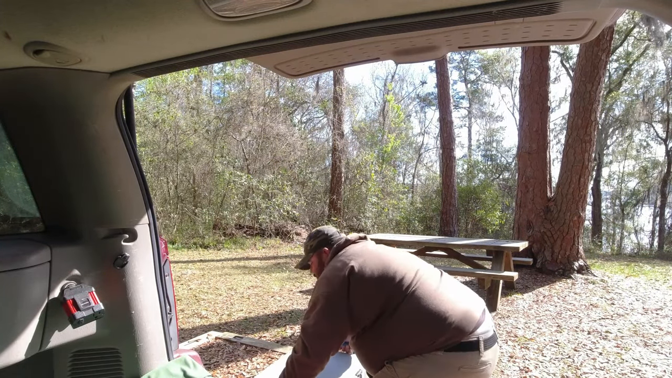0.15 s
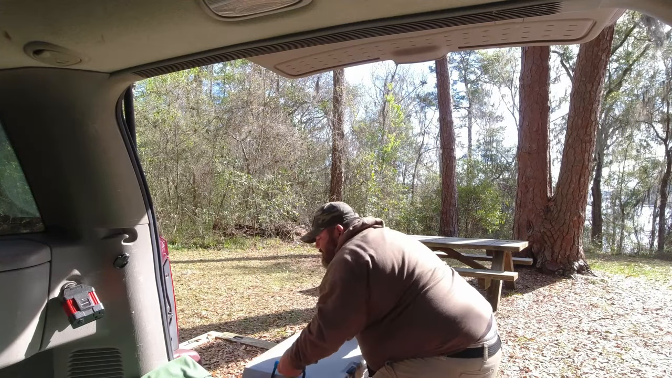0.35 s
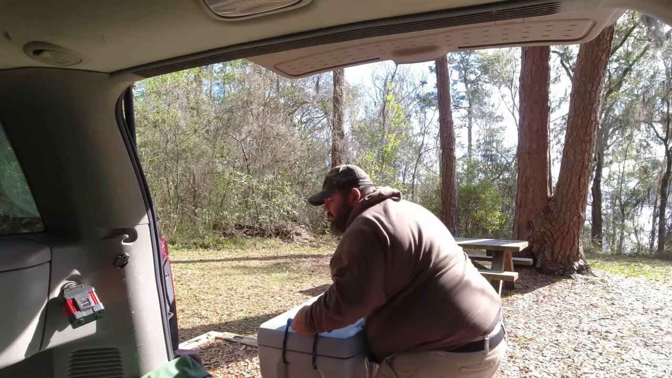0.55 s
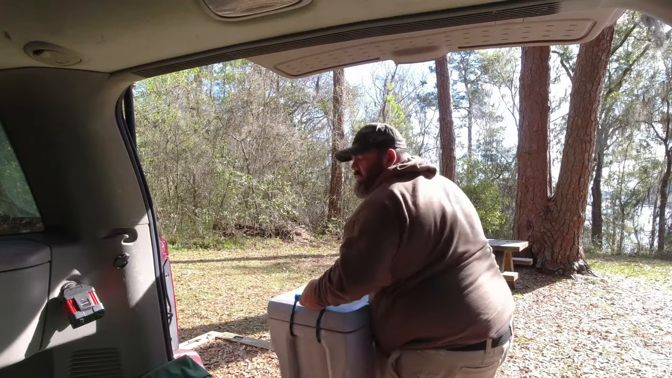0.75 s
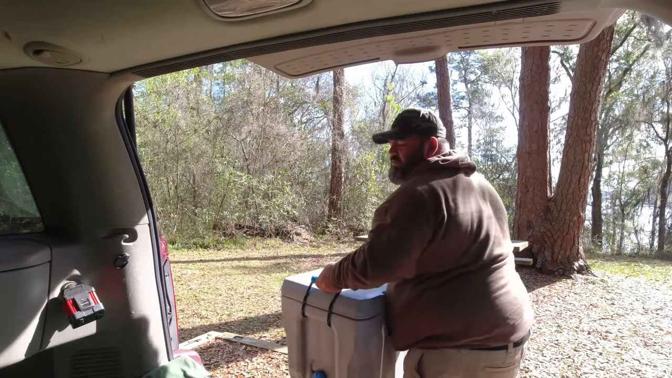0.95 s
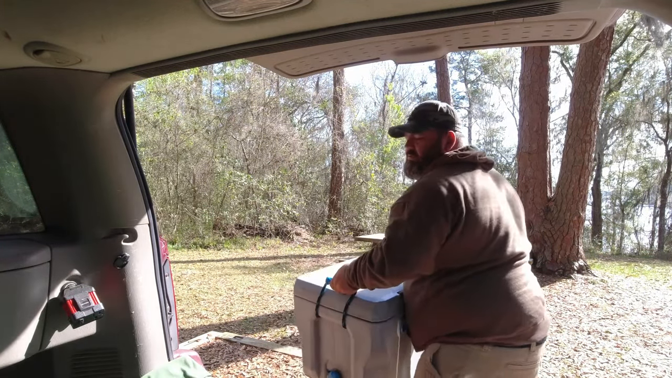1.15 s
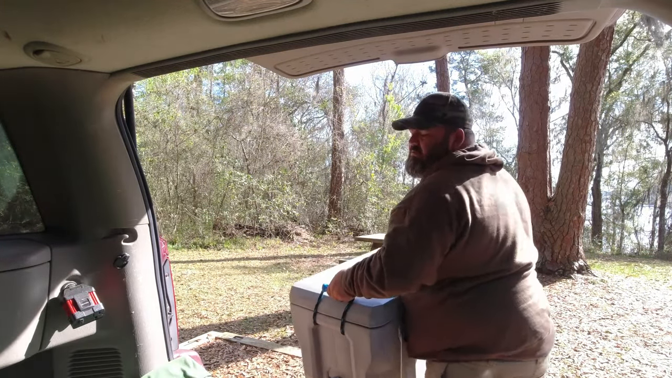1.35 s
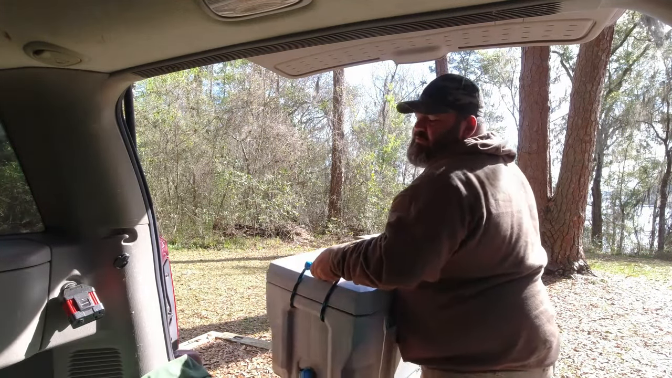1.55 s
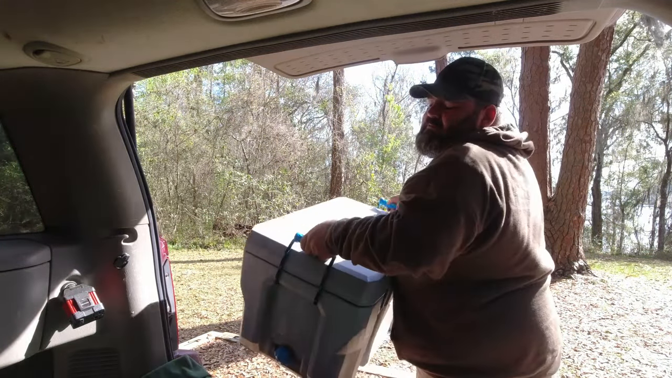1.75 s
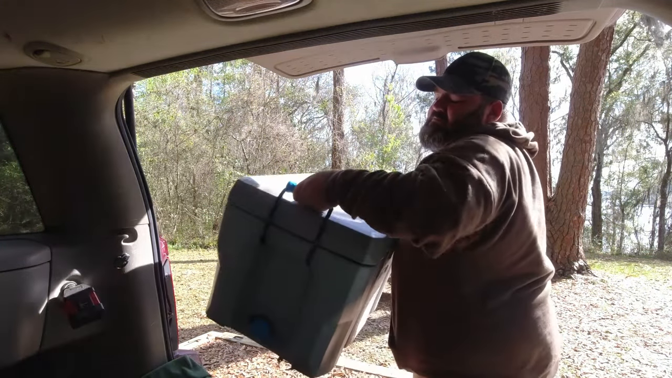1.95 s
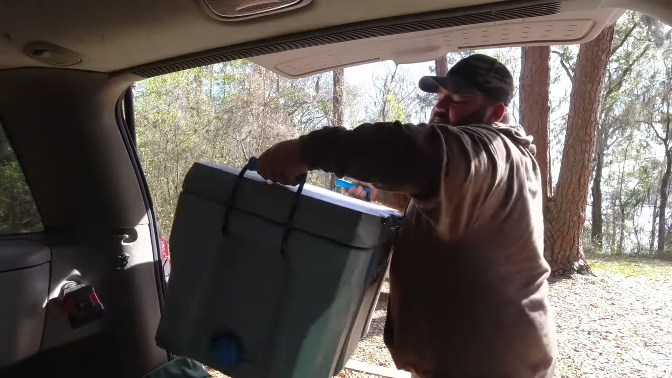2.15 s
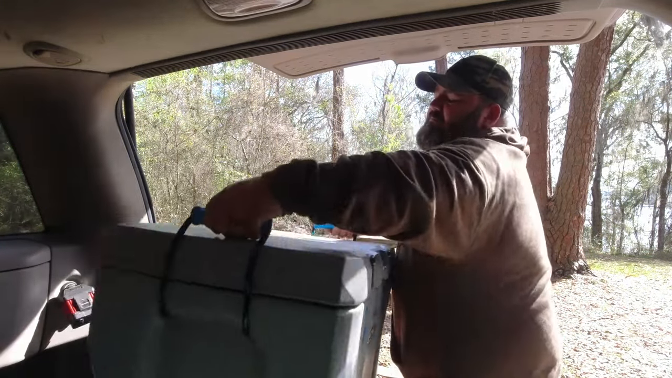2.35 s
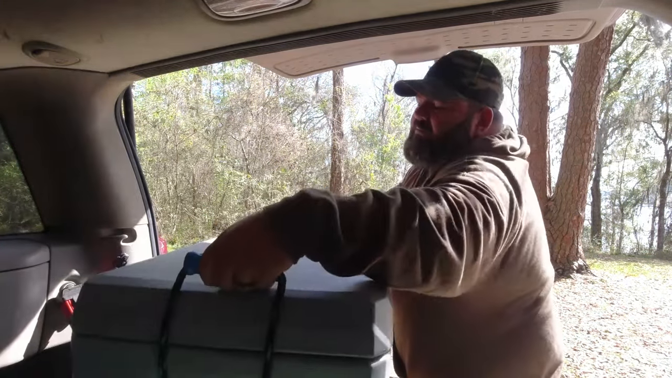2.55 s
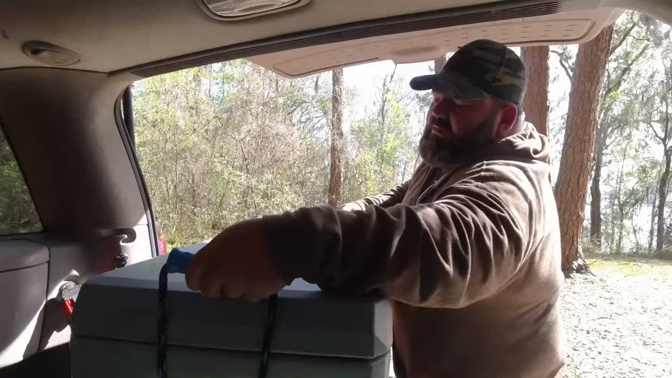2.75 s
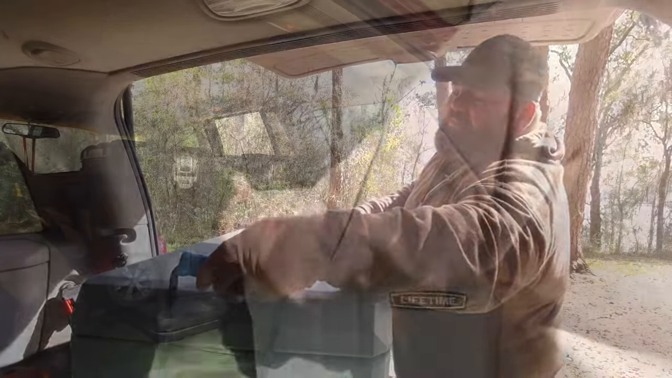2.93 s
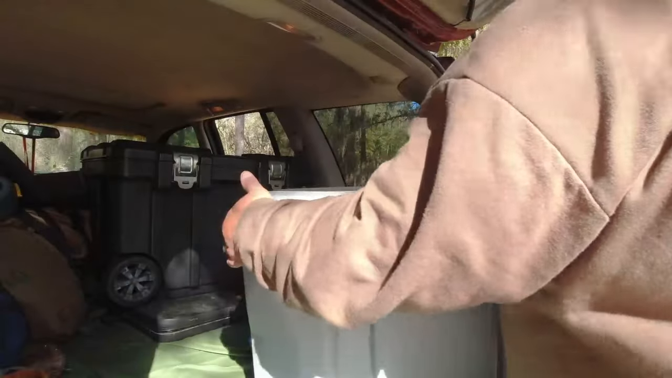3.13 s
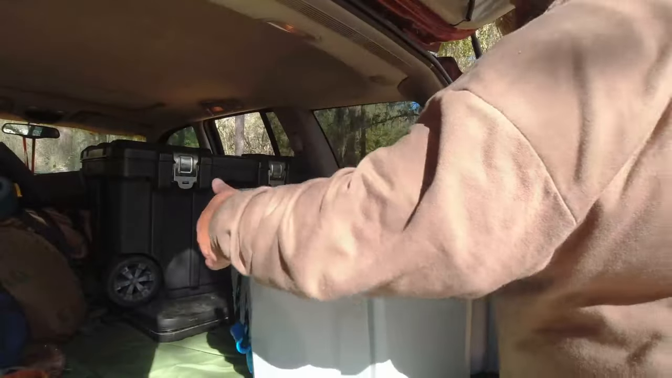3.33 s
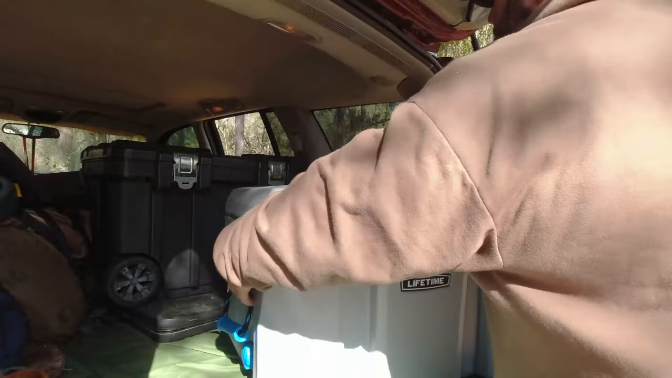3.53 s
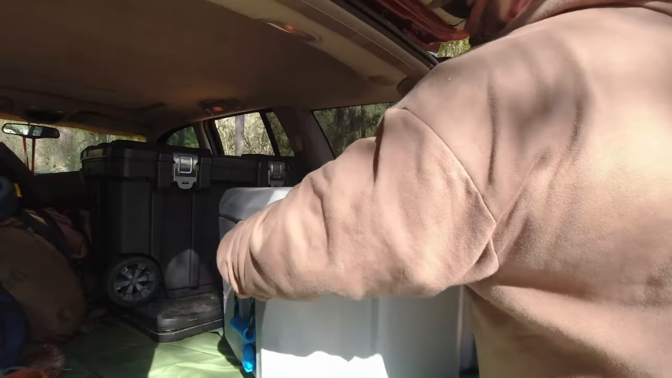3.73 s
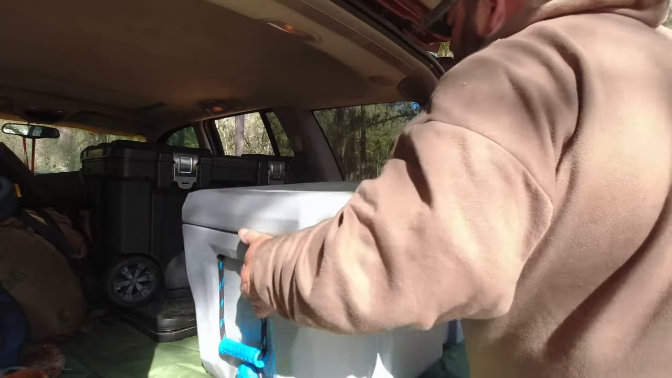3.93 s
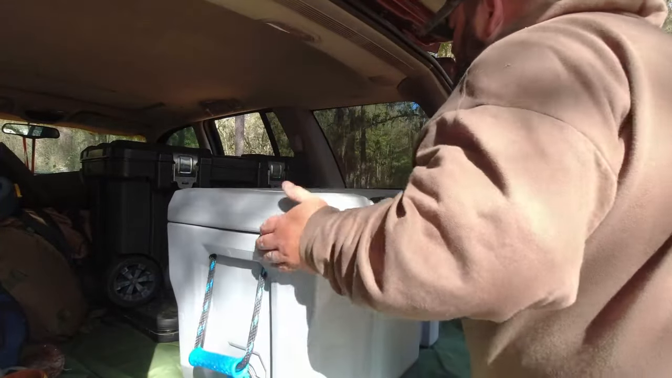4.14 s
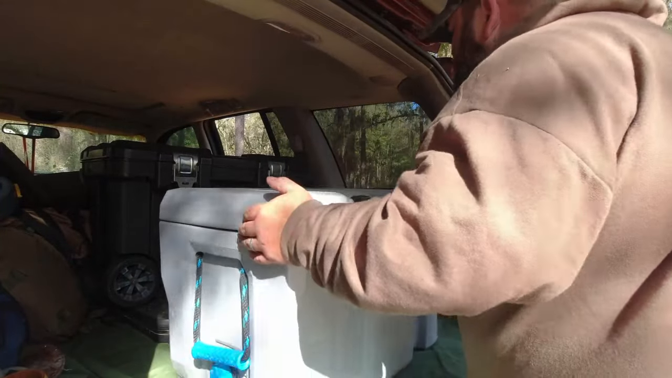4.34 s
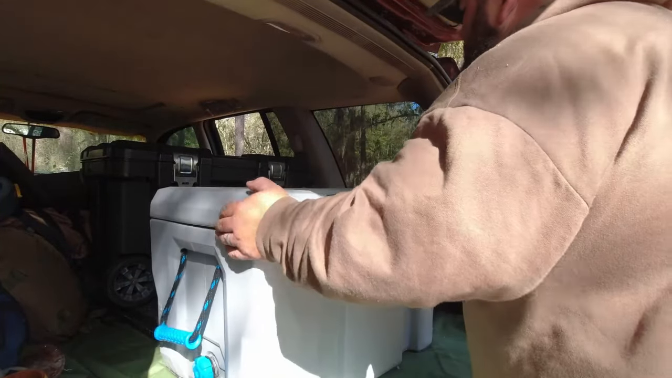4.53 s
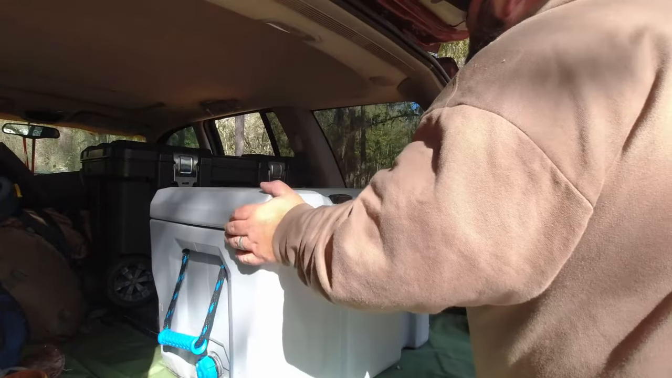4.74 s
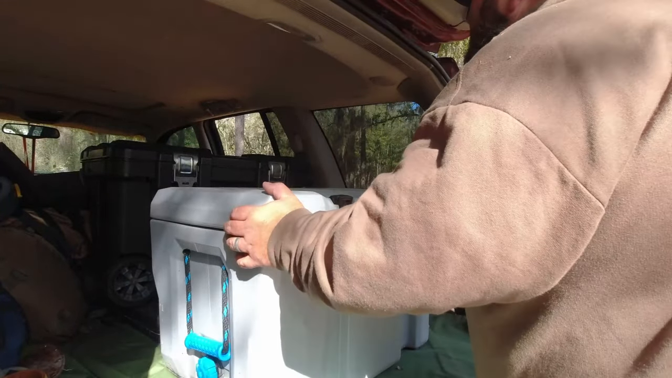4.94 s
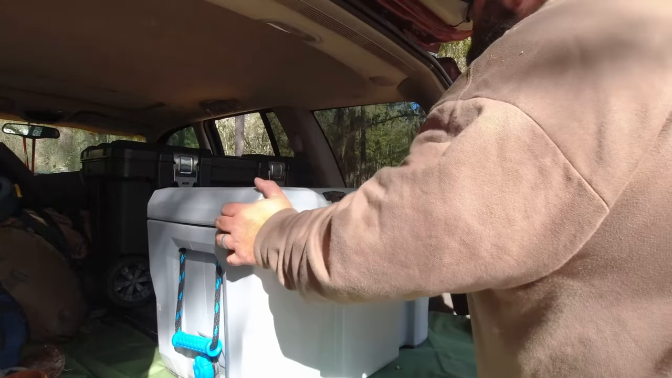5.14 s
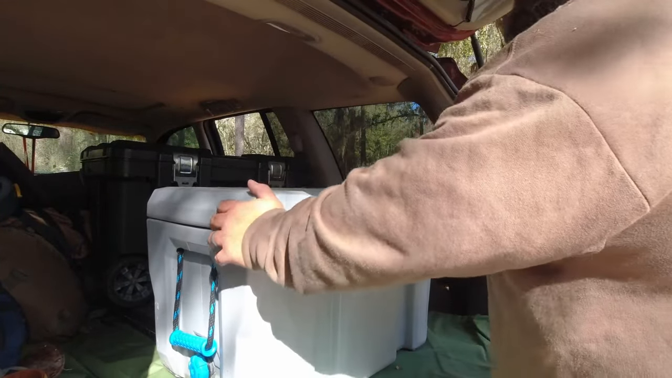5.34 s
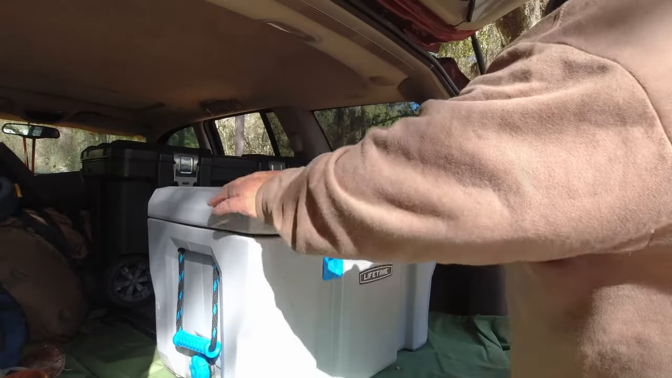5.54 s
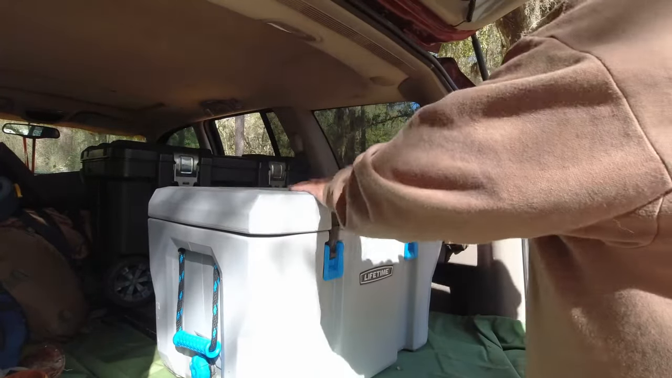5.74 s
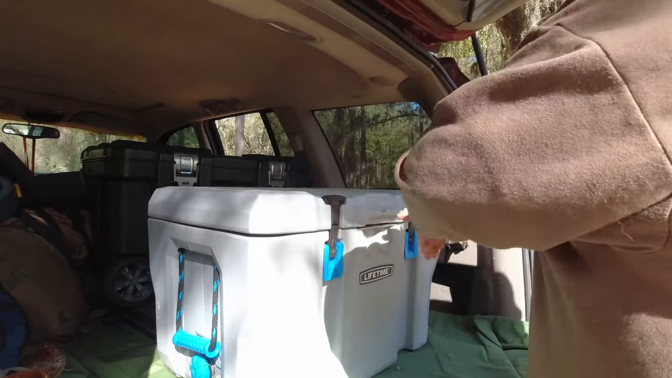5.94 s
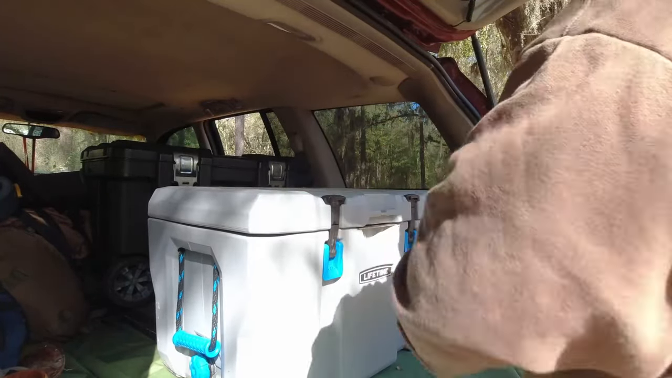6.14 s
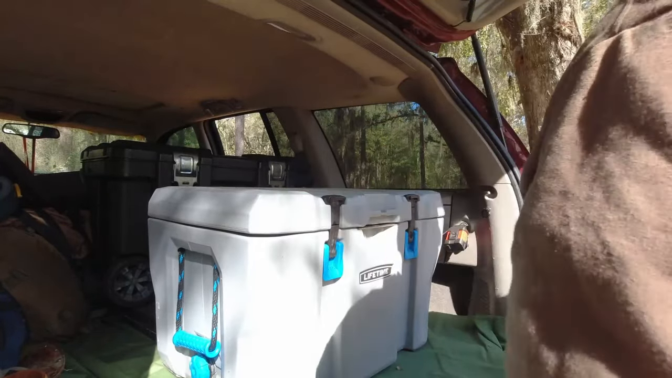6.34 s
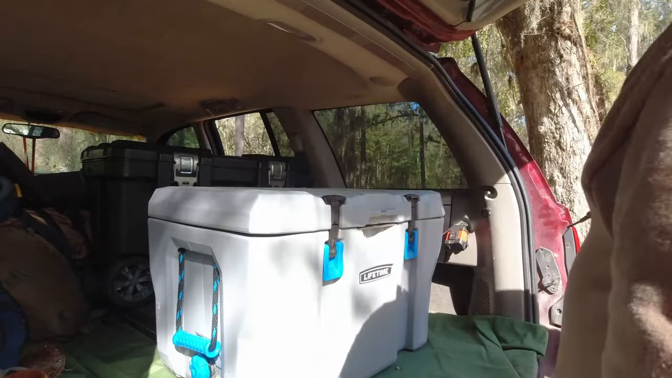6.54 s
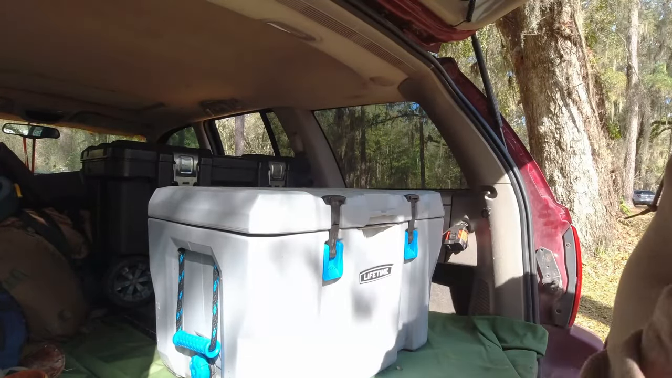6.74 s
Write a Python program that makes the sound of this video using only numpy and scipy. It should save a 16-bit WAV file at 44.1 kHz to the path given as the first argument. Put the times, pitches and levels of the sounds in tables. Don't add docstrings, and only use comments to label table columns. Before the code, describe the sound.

Faint woodland hiss and a low distant hum run throughout, gradually sinking. In the first 1.5 s a hollow plastic cooler is lifted: a faint early knock, a soft thud with rustle near 0.7-0.9 s, then small taps. At 1.7 s a sharp clack and cluster of hollow raps land with a deep car-body boom and bright rustling. A lull precedes heavier bumps at 2.4-2.7 s, the floor booming strongly around 2.5 s. From 2.9 to 4.5 s it is shoved over carpet with dry, grainy scraping, a droning wall and hard knocks near 3.5, 3.8, 4.25 and 4.5 s. Last raps fall at 4.6-5.0 s. Then it is quiet: quick bird chirps at 5.0-5.8 s, a soft boot scuff near 5.9 s, thin high whistles around 6.3 s, and faint rustles and taps to 6.8 s. Close stereo, short padded echo, slight thin hiss after 3.2 s.

```python
import sys
import numpy as np
from scipy import signal
from scipy.io import wavfile
from scipy.ndimage import uniform_filter1d

SR = 44100
rng = np.random.default_rng(int(sys.argv[2]) if len(sys.argv) > 2 else 0)


def wav_out(sig):
    wavfile.write(sys.argv[1], SR, np.round(np.clip(np.atleast_2d(sig).T, -1, 1) * 32767).astype(np.int16))


def attenuation_scalar(level_db):
    decades = np.asarray(level_db, float) / 20
    return 10 ** decades


N = 298998


def evened(x):
    return x / np.sqrt(np.mean(x ** 2) + 1e-20)


def coloured(x, points):
    hz = abs(np.fft.fftfreq(8192, 1 / SR))
    point_hz, point_db = np.transpose(points)
    gain_db = np.interp(np.log(hz + 1), np.log(point_hz + 1), point_db)
    log_gain = np.log(attenuation_scalar(np.maximum(gain_db, -100)))
    phase = -signal.hilbert(log_gain).imag
    taps = np.fft.ifft(np.exp(log_gain + 1j * phase)).real[:4096]
    return signal.oaconvolve(x, taps)[:len(x)]


def add(mix, s, sound):
    part = mix[round(s * SR):][:len(sound)]
    part += sound[:len(part)]


def resonate(x, hz, width):
    turn = np.exp(2j * np.pi * np.cumsum(hz) / SR)
    r = np.exp(-np.pi * width / SR)
    return 2 * (turn * signal.lfilter([1 - r], [1, -r], x / turn)).real


def patches(shape, bins, frames):
    field = uniform_filter1d(rng.standard_normal(shape), bins, axis=0)
    for _ in range(2):
        field = uniform_filter1d(field, frames, axis=1)
    return evened(field)


def wandering(x, patch_db):
    z = signal.stft(x, nperseg=1024, noverlap=768)[2]
    narrow = patches(z.shape, bins=2, frames=5)
    broad = patches(z.shape, bins=12, frames=4)
    gain = attenuation_scalar(patch_db * (narrow + 0.73 * broad))
    return evened(signal.istft(z * gain, nperseg=1024, noverlap=768)[1][:N])


def strokes(rows, base_db=0, share=0, steep=1):
    t = np.arange(0, N + 64, 32) / SR
    s, rise, fall, level_db, extra_db = np.transpose(rows)[:, :, None]
    away = np.where(t < s, (s - t) / abs(rise), (t - s) / abs(fall))
    loss_db = 20 * steep * away
    power = attenuation_scalar(2 * (level_db + base_db + share * extra_db - loss_db)).sum(axis=0)
    return np.interp(np.arange(N) / SR, t, np.sqrt(power))


# (frequency [Hz], level [dB], share of the ring time [1])
WALL_RINGS = [(252, -15, 0.44), (363, -8, 2.1), (448, -21, 0.5), (659.7, -2, 1.35), (970, -4.5, 0.65),
              (1118, -3, 0.85), (1110, -16, 0.79), (1350, 4, 0.38)]
# (frequency [Hz], level [dB], share of the ring time [1])
RIM_RINGS = [(1912, -2, 0.99), (2210, -4, .9), (2565, -5.5, 1), (2880, -0.5, 0.7), (3335, 5, 0.99),
             (3860, -12.5, 0.44), (4440, -9.5, .5), (4680, -14, 0.42)]
# (frequency [Hz], level per Hz [dB])
THUMP_TONE = [(110, -41), (180, -7.5), (357, -1), (667, -0.5), (801, -2.5), (908, -1), (1800, -24.5),
              (2340, -26.5), (3960, -120)]
# (frequency [Hz], level [dB])
CRACK_TONE = [(1000, -13.5), (1600, -1), (2100, 4.5), (2600, 7), (3300, 13.5), (3800, -3), (4500, 0),
              (6500, -39), (8900, -29.5), (11000, -62)]


def knock(peak_db, ring_hz, sharp_db, t60, touch_s, chance, noise):
    noise = noise[:round(2 * t60 * SR) + 900]
    t = np.arange(len(noise)) / SR
    ring = attenuation_scalar(10 - 60 * t / t60) * (1 - np.exp(-t / (0.94 * touch_s))) * np.sin(2 * np.pi * ring_hz * t)
    for (hz, db, share), (detune, weight, lag) in zip(WALL_RINGS, chance):
        late = np.maximum(t - touch_s * lag, 0)
        rise = 1 - np.exp(-late / (0.91 * touch_s))
        decay = attenuation_scalar(db + 6.3 * weight - 60 * late / (t60 * share))
        ring += decay * rise * np.sin(2 * np.pi * hz * (0.9 + 0.207 * detune) * late)

    sharp_rise = 1 - np.exp(-t / (0.4 * touch_s))
    rim = np.zeros(len(t))
    for (hz, db, share), (_, detune, weight) in zip(RIM_RINGS, chance):
        decay = attenuation_scalar(db + 13 * weight - 60 * t / (min(t60, 0.06) * share))
        rim += decay * np.sin(2 * np.pi * hz * (0.97 + 0.059 * detune) * t)
    rim *= sharp_rise

    fade = attenuation_scalar(-60 * t / (1.73 * t60)) + 3.16 * np.exp(-t / touch_s)
    burst = noise * sharp_rise * fade
    thump, crack = coloured(burst, THUMP_TONE), coloured(burst, CRACK_TONE)
    whole = ring / abs(ring).max() + thump / abs(thump).max()
    whole += attenuation_scalar(sharp_db + 7) * crack / abs(crack).max()
    whole += attenuation_scalar(sharp_db + 6) * rim / abs(rim).max()
    return attenuation_scalar(peak_db) * whole / abs(whole).max()


def strike(blows, touch_s):
    hits = np.zeros(N)
    chances = rng.random((len(blows), len(WALL_RINGS), 3))
    noises = rng.standard_normal((len(blows), SR // 7))
    for (s, *blow), chance, noise in zip(blows, chances, noises):
        add(hits, s, knock(*blow, touch_s, chance, noise))
    return hits


# (time [s], peak level [dB], strongest ring [Hz], sharpness [dB], ring time t60 [s])
KNOCKS = [(0.15, -56.5, 335, -18, 0.074), (0.69, -54, 360, -45, 0.47), (1.151, -48.5, 356, -20, 0.37),
          (1.4, -39.5, 1050, -34, 0.053), (1.449, -46, 337, -20, 0.1), (1.472, -42, 1050, -25, 0.033),
          (2.221, -46.5, 550, 22, 0.088), (2.387, -22, 1015, -65, 0.04), (2.456, -22.5, 342, -29, 0.033),
          (2.833, -36, 470, -39, 0.027)]
# (time [s], peak level [dB], strongest ring [Hz], sharpness [dB], t60 [s])
CLACKS = [(1.696, -22.5, 326, -14.5, 0.11), (3.525, -20, 338, -31, 0.056), (3.796, -15, 578, -19, 0.048),
          (4.4825, -13.5, 412, -10, 0.025), (4.487, -18, 346.5, -32.5, 0.078),
          (4.9727, -18.5, 617, -24, 0.059), (4.9838, -16.5, 384, -14, 0.032)]
# (time [s], peak level [dB], strongest ring [Hz], sharpness [dB], t60 [s])
BUMPS = [(0.876, -35, 363.7, -32, 0.24), (1.881, -32, 704, -20.5, 0.039), (1.915, -30, 1019, -14, 0.064),
         (2.486, -22, 570, -23.5, 0.046), (2.499, -20.5, 690, -29.5, 0.048), (2.558, -23, 740, -18, 0.036),
         (3.641, -29, 490, -18.5, 0.05), (3.824, -24.5, 637, -27.5, 0.025),
         (4.6465, -23, 510, -23.5, 0.014)]
# (time [s], peak level [dB], strongest ring [Hz], sharpness [dB], t60 [s])
RAPS = [(2.905, -30.5, 487, -43, 0.14), (3.06, -28, 687, -43, 0.02), (3.323, -33, 588.5, -20, 0.28),
        (3.549, -16, 496, -21, 0.0096), (3.742, -20.5, 374, -37, 0.04), (4.229, -19, 772, -27, 0.036),
        (4.27, -17.5, 470, -18, 0.043), (4.587, -16.5, 535, -23, 0.017), (4.734, -32.5, 500, -53, 0.023),
        (4.834, -45.5, 690, -2, .05), (4.9352, -20, 654, -18, 0.052), (5.458, -51.5, 304, -22, 0.14),
        (6.157, -50, 1027, -32, 0.11), (6.324, -50.5, 767, -23, 0.34), (6.602, -48, 1130, -33, 0.12),
        (6.656, -43.5, 1120, -20.5, 0.086)]
# (time [s], peak level [dB], strongest ring
# [Hz], sharpness [dB], t60 [s])
BOUNCES = [(1.729, -21, 1090, -8, 0.08), (1.748, -22, 700, -18, 0.11), (1.796, -21.5, 640, -24, 0.047),
           (1.963, -60, 716, -25, 0.029), (2.404, -33, 1015, -21, 0.032), (2.519, -27, 940, -41, 0.024),
           (2.575, -28, 592, -14, 0.037), (2.731, -28.5, 900, -44, 0.046), (3.563, -24, 896, -27.5, 0.025),
           (3.749, -34, 500, -33, 0.017), (3.835, -21, 654, -24, 0.026), (4.154, -27, 770, -21, 0.046),
           (4.176, -25.5, 800, -19, 0.058), (4.235, -15, 780, -28, 0.019), (4.24, -27.5, 598, -25.5, 0.018),
           (4.243, -22, 500, -27.5, 0.013), (4.266, -24, 600, -27.5, 0.029),
           (4.276, -13, 901, -26.5, 0.021), (4.333, -40, 1036, -22, 0.035),
           (4.503, -35.5, 700, -16.5, 0.035), (4.591, -15, 910, -23, 0.061), (4.65, -18, 1213, -25, 0.024),
           (4.938, -18, 877, -22.5, 0.031), (.778, -43, 1010, -13, 0.06), (.889, -40, 1032, -33, 0.077),
           (.912, -40, 865, -24.5, 0.07), (.93, -44, 597, -9, .06), (2.943, -34, 755, -35, 0.039),
           (3.525, -20.5, 416, -41, 0.023), (4.9727, -32, 458, -15, 0.025), (2.486, -23, 690, -16, 0.02)]


def blows():
    first = strike(KNOCKS, touch_s=0.00307) + strike(RAPS, touch_s=0.004)
    handle_and_padding = strike(CLACKS, touch_s=0.00096) + strike(BUMPS, touch_s=0.0065)
    return first + handle_and_padding + strike(BOUNCES, touch_s=0.002025)


def in_cargo_bay(hits):
    t = np.arange(SR // 8) / SR
    tail = rng.standard_normal(len(t)) * attenuation_scalar(-60 * t / 0.085)
    echo = signal.oaconvolve(hits, tail / np.linalg.norm(tail))[:N]
    return hits + attenuation_scalar(-11) * echo


# (time [s], peak level [dB], strongest ring [Hz], sharpness [dB],
# t60 [s])
TICKS = [(2.439, -33, 950, -21, .03), (2.462, -26.5, 698, -22, 0.028), (2.493, -27, 897, -17, .025),
         (2.777, -46, 900, -24, .03), (2.914, -35, 700, -30, 0.038), (1.7401, -24.5, 800, -17, 0.026),
         (1.7624, -28, 905, -19, 0.033), (1.787, -25, 800, -14, .03), (1.8145, -24, 697, -19, 0.036),
         (4.4895, -21.5, 900, -19, .03), (4.994, -30.5, 860, -18, 0.019), (5.015, -42, 1100, -24, .03),
         (3.806, -28.5, 740, -18, .025), (4.483, -15, 3350, -8, 0.023), (4.984, -20, 3900, -4, 0.018),
         (3.5505, -15.5, 1300, -16, 0.025), (2.558, -30, 710, -15, 0.021), (.895, -37, 1000, -25, .08),
         (6.158, -51, 1200, -40, .06), (3.7425, -23.5, 1150, -32, .03)]


def ticks():
    return strike(TICKS, touch_s=0.0011)


# (time [s], peak level [dB], pitch [Hz], ring time t60 [s], rise [s])
THUDS = [(0.69, -29, 137, 0.049, 0.0017), (0.72, -35.5, 90.5, 0.23, 0.0024),
         (0.749, -35, 237, 0.046, 0.0037), (0.699, -42, 323, 0.12, 0.004),
         (1.698, -14.5, 170, 0.016, 0.0012), (1.709, -14.5, 70, 0.11, 0.0024),
         (1.766, -22, 71.4, 0.3, 0.005), (1.855, -29, 59, .08, 0.0038), (2.632, -18, 54.7, 0.056, .008),
         (2.445, -19.5, 120, 0.1, 0.005), (2.5355, -7.5, 71.4, 0.12, 0.013),
         (2.667, -21.5, 174.6, 0.098, 0.0076), (3.491, -37, 63, 0.2, 0.0079),
         (3.922, -32.5, 57.3, 0.32, 0.0041), (4.149, -17, 52, 0.11, 0.0052),
         (5.828, -42, 120.2, 0.038, 0.0053), (.14, -56, 290, 0.065, 0.0058), (2.375, -42, 190, .06, 0.0067),
         (5.05, -59, 233, 0.066, .005), (5.2, -63, 182, 0.042, .005), (5.41, -53, 202, 0.055, .004),
         (5.9, -50, 129, .12, .01)]


def thuds():
    out = np.zeros(N)
    t = np.arange(round(0.4 * SR)) / SR
    for s, peak_db, hz, t60, rise in THUDS:
        turns = hz * (0.865 * t + 0.0051 * (1 - np.exp(-t / 0.029)))
        boom = np.sin(2 * np.pi * turns) * (1 - np.exp(-(t / rise) ** 2)) * attenuation_scalar(-60 * t / t60)
        add(out, s, attenuation_scalar(peak_db) * boom / abs(boom).max())
    return out


def slips(per_s, spread_db, judder_db):
    catches = rng.random(N) < per_s / SR
    size = attenuation_scalar(spread_db * np.minimum(rng.exponential(1, N), 5)) * catches
    clumps = uniform_filter1d(uniform_filter1d(rng.standard_normal(N), size=500), size=500)
    return size * rng.standard_normal(N) * attenuation_scalar(judder_db * evened(clumps))


# (time [s], pressure [dB], speed [dB])
SHOVES = [
    [(2.886, -49.5, -11), (2.9, -47.5, -12), (3.05, -44.5, -8), (3.2, -48, -5.5), (3.34, -53.5, 0),
     (3.5, -45, -9), (3.616, -41, -25), (3.692, -52, -19), (3.73, -65, -9)],
    [(3.73, -57.5, -12.5), (3.9, -45.5, -14.5), (4.046, -44, -2.5), (4.14, -42, -6), (4.256, -35.5, -23.5),
     (4.32, -50, -12.5), (4.406, -49, 0.5), (4.47, -49.5, -0.5), (4.49, -74, -15.5)],
]


def shoves(speed_share):
    out = np.zeros(N)
    for rows in SHOVES:
        s, press_db, speed_db = np.transpose(rows)
        t = np.arange(s[0], s[-1], 1 / SR)
        add(out, t[0], attenuation_scalar(np.interp(t, s, press_db + speed_share * speed_db)))
    return uniform_filter1d(out, size=100)


# (peak time [s], rise [s], fall [s], pressure [dB], brightness [dB])
DRAGS = [(.775, 0.029, 0.21, -52.5, 2.5), (.908, 0.078, 0.2, -44.5, -7), (1.19, 0.14, 0.17, -65.5, 2.5),
         (1.41, 0.21, .03, -58, -15), (1.45, 0.02, 0.19, -58.5, -19), (1.699, 0.01, 0.03, -37, -4),
         (1.735, 0.035, 0.25, -28, -13.5), (1.82, 0.09, 0.13, -33.5, -20.5), (1.91, 0.22, 0.1, -45, -6),
         (2.16, 0.22, 0.099, -55.5, -24), (2.39, 0.015, 0.24, -39, -68), (2.466, 0.045, 0.39, -31.5, -18),
         (2.575, 0.065, 0.19, -31.5, -16.5), (2.686, 0.27, 0.083, -35.5, -15.5), (2.73, .1, 0.12, -60.5, 1),
         (2.5, .03, 0.035, -35.5, -13), (6.07, 0.39, 0.73, -62.5, -27.5), (6.36, 0.18, 0.47, -59, -26),
         (6.562, 0.12, 0.22, -53, -25), (6.662, 0.023, 0.082, -53, -32), (6.78, 0.42, 0.089, -58.5, -32)]
# (peak time [s], rise [s], fall [s], pressure [dB], brightness [dB])
SCRAPES = [(3.554, 0.051, 0.053, -41.5, -26.5), (4.11, 0.17, 0.17, -47.5, -22),
           (4.276, 0.016, 0.023, -36, -42), (4.485, 0.042, 0.15, -43, -10.5), (4.592, .008, 0.024, -52, -9),
           (4.85, 0.81, 0.44, -61.5, -35.5), (4.915, 0.023, 0.034, -51.5, -32),
           (4.983, 0.012, 0.037, -43.5, -11.5), (5.26, 0.3, 0.97, -69, -21),
           (5.468, 0.57, 0.14, -66.5, -30), (5.62, 0.15, 0.72, -68.5, -27)]
# (peak time [s], rise [s], fall [s], pressure [dB], brightness [dB])
SCUFFS = [(5.83, 0.089, 0.11, -57.5, -27), (5.885, 0.12, 0.098, -58, -13), (5.92, 0.13, 0.1, -62, 9.5),
          (5.96, .1, 0.031, -65, 11.5), (5.88, .08, .1, -64.5, 6)]
# (peak time [s], rise [s], fall [s], level [dB], brightness [dB])
DRONE = [(3.4, 0.38, .25, -46, 0)]
# (frequency [Hz], level per Hz [dB])
RUSTLE_TONE = [(88, -3), (150, -7.5), (226, 0.5), (296, -4.5), (431, -10.5), (692, -4), (761, -11.5),
               (1010, -11), (1990, -18), (2450, -21.5), (3300, -22.5), (3740, -30), (6500, -48.5),
               (8450, -79.5), (14300, -120)]
# (frequency [Hz], level per Hz [dB])
SLIDE_TONE = [(88, -28.5), (150, -14), (222, 5.5), (282, -4), (341, 2), (489, -6.5), (630, -1.5), (837, -9),
              (1280, -9.5), (2000, -14), (2690, -16.5), (3250, -12), (3550, -15), (3800, -21.5),
              (6500, -41.5), (8450, -81.5), (14300, -120)]
# (frequency [Hz], level per Hz [dB])
FIZZ_TONE = [(2940, -6), (5000, -4.5), (7290, -14.5), (9020, -2), (10200, -15.5), (11100, -12.5),
             (11900, -27), (12800, -15), (13800, -13.5), (15000, -19), (15700, -29.5)]


def fizz():
    bright = wandering(coloured(slips(per_s=14000, spread_db=1.2, judder_db=1.2), FIZZ_TONE), patch_db=1.8)
    low_pass = signal.butter(8, 9800, fs=SR, output="sos")
    muffled = evened(signal.sosfilt(low_pass, bright))
    brush = strokes(DRAGS + SCRAPES + SCUFFS, share=0.94, steep=1.236)
    sharp = brush ** 4 / (brush ** 4 + attenuation_scalar(4 * -57))
    return brush * (sharp * bright + (1 - sharp) * muffled)


def rasp_strokes(rows, base_db):
    return strokes(rows, base_db, share=0.083, steep=1.064)


def rub(sound, low, high):
    low_pass = signal.butter(2, 1600, fs=SR, output="sos")
    rumble = signal.sosfiltfilt(low_pass, sound)
    return evened(rumble) * low + evened(sound - rumble) * high


def drags():
    rustle = coloured(slips(per_s=2900, spread_db=-0.5, judder_db=-0.5), RUSTLE_TONE)
    rustle = wandering(rustle, patch_db=4)
    slide = coloured(slips(per_s=8100, spread_db=0.4, judder_db=0), SLIDE_TONE)
    slide = wandering(slide, patch_db=3)
    carpet_low = strokes(SCRAPES + SCUFFS) + shoves(speed_share=0)
    carpet_high = rasp_strokes(SCRAPES, -5) + rasp_strokes(SCUFFS, 7) + shoves(speed_share=1)
    out = fizz() + rub(rustle, strokes(DRAGS), rasp_strokes(DRAGS, -9.5))
    out += rub(slide, carpet_low, carpet_high)
    drone = resonate(slide, np.full(N, 619), width=110)
    return out + evened(drone) * strokes(DRONE)


# (peak time [s], rise [s], fall [s], floor boom level [dB], spring sway minus boom [dB])
JOLTS = [(1.70, 0.0036, 0.18, -17.5, -12), (1.809, 0.07, 0.19, -29.5, -23), (1.863, 0.047, 0.16, -31, 4.5),
         (2.2, 0.59, 0.2, -63, 23.5), (2.44, 0.0045, 0.29, -18, -14), (2.516, 0.069, 0.088, -22.5, 3),
         (2.624, 0.053, 0.21, -33.5, 7), (2.694, 0.088, 0.12, -21.5, -4.5), (2.89, 0.28, 0.14, -52, 20),
         (2.99, .12, 0.38, -48, -11.5), (3.242, 0.52, 0.25, -36.5, -25), (3.506, 0.053, 0.12, -31.5, -27.5),
         (3.554, 0.094, 0.14, -24.5, -28), (3.602, 0.033, 0.22, -42, 6.5), (3.906, .3, 0.51, -43, -15),
         (4.14, 0.018, 0.12, -28, 1.5), (4.166, .04, 0.17, -22.5, -11), (4.29, 0.15, 0.091, -48, 12)]
# (frequency [Hz], level per Hz [dB])
BOOM_TONE = [(26, -26.5), (45, 7), (71, -5.5), (102, -3), (129, -12.5), (157, -6.5), (250, -14.5),
             (320, -49), (550, -120)]


def car():
    spring = signal.butter(2, [15, 27.1], "band", fs=SR, output="sos")
    sway = evened(signal.sosfilt(spring, rng.standard_normal(N))) * strokes(JOLTS, share=0.88, steep=0.76)
    boom = evened(coloured(rng.standard_normal(N), BOOM_TONE)) * strokes(JOLTS)
    return attenuation_scalar(-4) * sway + attenuation_scalar(-6.5) * boom


# (time [s], length [s], from [Hz], to [Hz], level [dB])
CHIRPS = [(5.045, .01, 4000, 5000, -73), (5.074, .008, 4200, 5000, -75), (5.129, .006, 3500, 4600, -66),
          (5.158, .011, 5150, 4300, -63), (5.187, .008, 5100, 4400, -69), (5.267, .008, 4000, 4900, -72),
          (5.35, .019, 5100, 3600, -63), (5.375, .013, 5100, 4200, -65), (5.428, .013, 3500, 4900, -61),
          (5.45, .012, 3600, 5100, -59), (5.543, .017, 5050, 4400, -59), (5.57, .008, 5100, 4300, -62),
          (5.624, .012, 3600, 5000, -61), (5.645, .013, 3700, 5100, -59), (5.745, .02, 5100, 3700, -66),
          (5.77, .008, 5100, 4600, -68), (6.468, .015, 4700, 4000, -70)]


def near_bird():
    near = np.zeros(N)
    for s, length, from_hz, to_hz, db in CHIRPS:
        u = np.linspace(0, 1, round(length * SR))
        if from_hz <= to_hz:
            u = u[::-1]
        hz = max(from_hz, to_hz) - abs(from_hz - to_hz) * u ** 1.35
        whistle = np.sin(2 * np.pi * np.cumsum(hz) / SR)
        add(near, s, attenuation_scalar(db) * whistle * np.hanning(len(hz)) ** 0.5)
    t = np.arange(SR // 4) / SR
    trees = rng.standard_normal(len(t)) * attenuation_scalar(-60 * t / 0.28) * np.minimum(t / 0.02, 1)
    echo = signal.oaconvolve(near, trees / np.linalg.norm(trees))[:N]
    return near + attenuation_scalar(-2.5) * echo


# (start time [s],
# length [s], from [Hz], to [Hz], level [dB])
SEEPS = [(1.02, 0.21, 7400, 8440, -70), (5.227, .11, 7250, 7200, -79), (5.315, 0.066, 7300, 6900, -75),
         (5.377, 0.18, 7200, 7340, -83.5), (5.476, 0.176, 7740, 7440, -76), (5.524, .05, 7000, 7000, -74),
         (5.702, 0.057, 7100, 7120, -64.5), (5.739, 0.084, 7130, 6830, -75), (6.01, .09, 7760, 7740, -78),
         (6.101, 0.1, 6920, 6940, -65.5), (6.169, 0.11, 6550, 6550, -75), (6.214, 0.12, 5600, 5600, -79),
         (6.524, 0.07, 3480, 4910, -65), (6.299, 0.15, 7750, 7270, -56.5), (6.388, 0.24, 7650, 7940, -72.5),
         (3.006, 0.07, 6700, 6670, -71), (6.296, 0.12, 8300, 8100, -75), (6.53, 0.092, 8800, 8840, -87),
         (6.294, .12, 6990, 6740, -73)]


def high_bird():
    far = np.zeros(N)
    breaths = rng.standard_normal((len(SEEPS), SR // 2))
    for (s, length, from_hz, to_hz, db), breath in zip(SEEPS, breaths):
        u = np.linspace(0, 1, round(length * SR))
        hz = from_hz + (to_hz - from_hz) * u
        width = 230 * attenuation_scalar(0.32 * (db + 70))
        fuzz = resonate(resonate(breath[:len(u)], hz, width), hz, width)
        swell_db = np.interp(u, [0, 0.5, 1], [-13, 0, -13])
        add(far, s, attenuation_scalar(db + swell_db) * evened(fuzz) * signal.windows.tukey(len(u), 0.15))
    return far


# (frequency [Hz], level per Hz [dB])
AIR_TONE = [(12, -10), (20, -10), (98, -4), (154, -17), (318, -25.5), (445, -33.5), (715, -28.5),
            (1250, -34), (3820, -40.5), (4910, -43.5), (5980, -45), (8000, -61), (12600, -67.5),
            (13300, -67), (15900, -74.5)]
# (time [s], level [dB])
AIR_SWELL = [(0, 8), (.6, 7.5), (1.6, 8), (2.898, 6), (5.102, 3.5), (6.78, 1.5)]
# (frequency [Hz], level [dB])
HUM = [(59.2, -67), (91.5, -65.5), (145.3, -73.5)]


def air():
    hiss = attenuation_scalar(-67.5) * wandering(coloured(rng.standard_normal(N), AIR_TONE), patch_db=1.3)
    hum = np.zeros(N)
    for hz, hum_db in HUM:
        hum += attenuation_scalar(hum_db - 8) * evened(resonate(rng.standard_normal(N), np.full(N, hz), width=3.6))
    swell_db = np.interp(np.arange(N) / SR, *np.transpose(AIR_SWELL))
    return attenuation_scalar(swell_db) * hiss + attenuation_scalar(1.8 * swell_db - 5) * hum


# (frequency [Hz], level per Hz [dB])
SELF_HISS_TONE = [(4000, -30), (7000, -2), (9000, 0), (12600, -1), (12800, -30)]


def self_hiss():
    hiss = evened(coloured(rng.standard_normal(N), SELF_HISS_TONE))
    return attenuation_scalar(-97.5) * hiss * (np.arange(N) / SR > 3.2)


# (frequency [Hz], side minus mid level [dB])
WIDTH = [(60, -13), (120, -34.5), (240, -24.5), (480, -18), (950, -13), (1890, -7), (3770, -0.5),
         (7520, -1), (15000, -0.5)]
# (time [s], share [1])
LEAD = [(0, -1.22), (5.3, 0.028), (5.9, 0.85), (6.78, 1)]


def capsules(mid):
    hz, t, z = signal.stft(mid, SR, nperseg=256, noverlap=192)
    width_hz, width_db = np.transpose(WIDTH)
    gain = attenuation_scalar(np.interp(np.log(hz + 1), np.log(width_hz), width_db))[:, None]
    lead = np.interp(t, *np.transpose(LEAD))
    phase_lead = 0.9 * lead + 0.76 * patches(z.shape, bins=3, frames=8)
    echoes = 0.48 * patches(z.shape, bins=2, frames=4)
    side = signal.istft(z * gain * (1j * phase_lead + echoes), nperseg=256, noverlap=192)[1][:N]
    return np.array([mid + side, mid - side])


def scene():
    cooler = in_cargo_bay(blows()) + ticks() + drags()
    vehicle = thuds() + car()
    outside = near_bird() + high_bird() + air()
    return capsules(cooler + vehicle + outside + self_hiss())


def roll_off(x):
    return signal.sosfilt(signal.butter(12, 15760, fs=SR, output="sos"), x)


def record(dry):
    return roll_off(dry)


dry = scene()
out = record(dry)
wav_out(out)
```